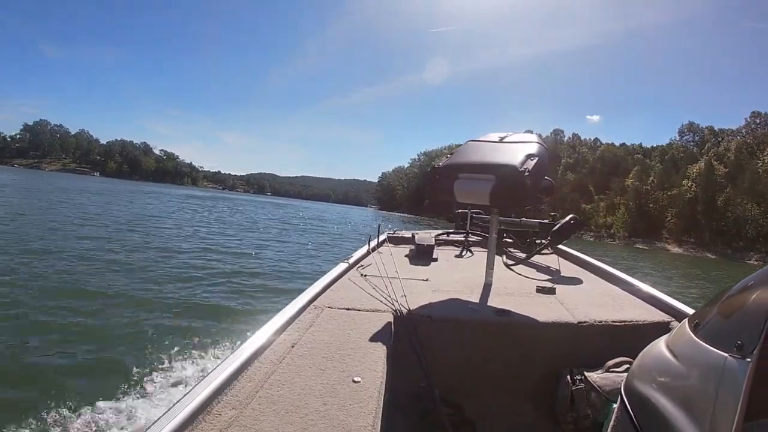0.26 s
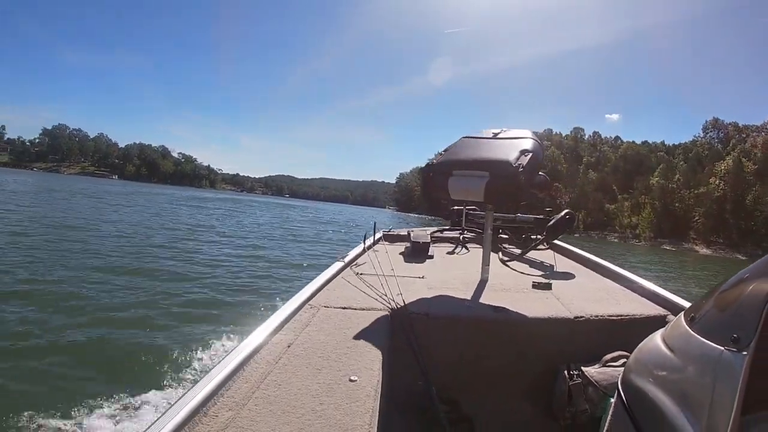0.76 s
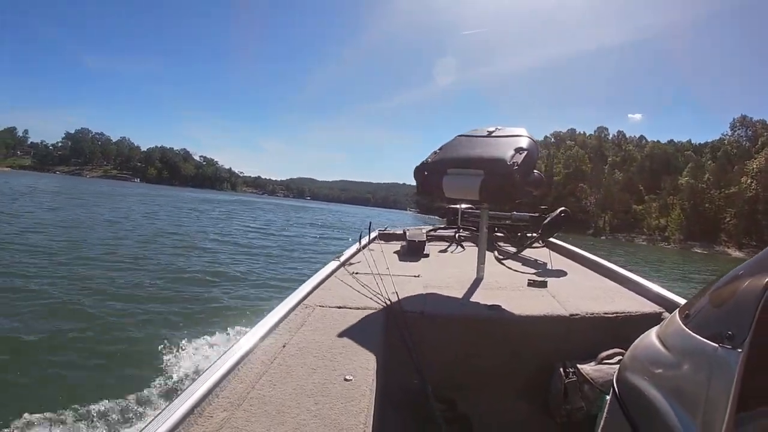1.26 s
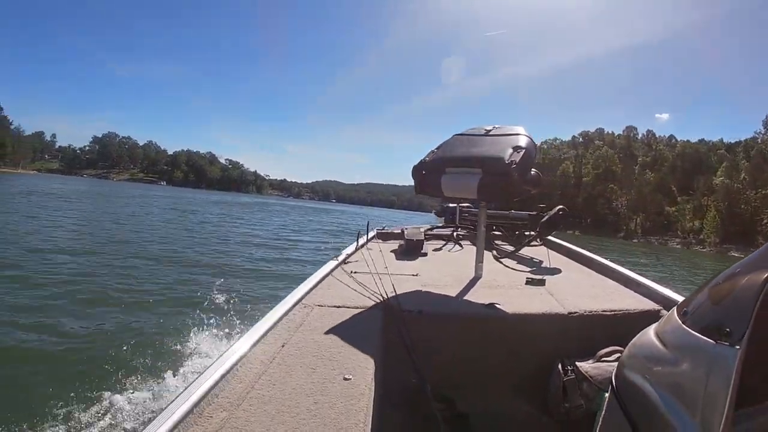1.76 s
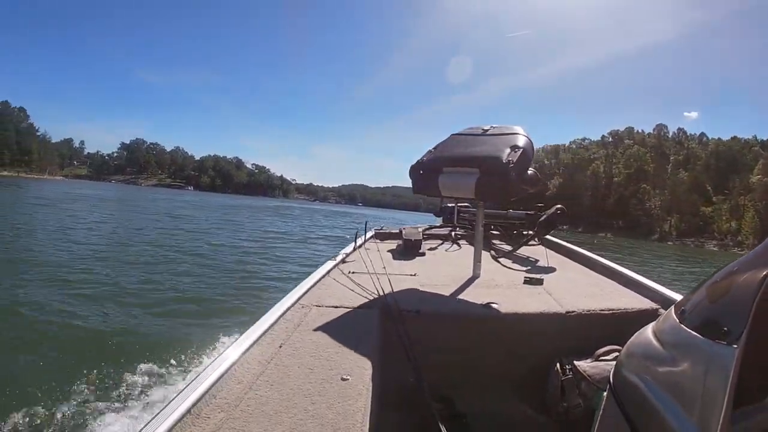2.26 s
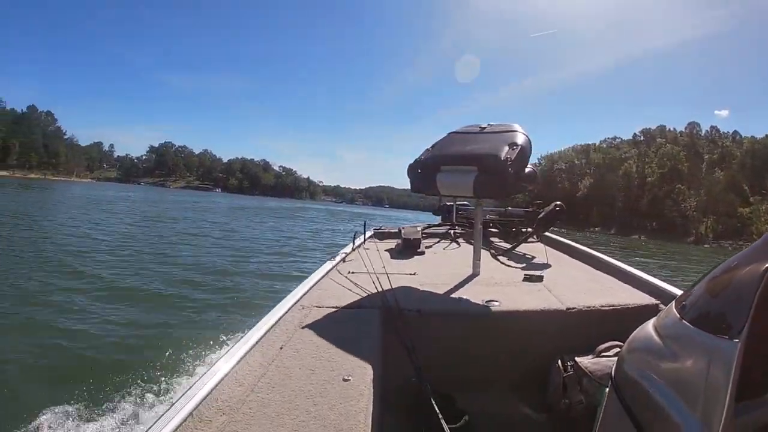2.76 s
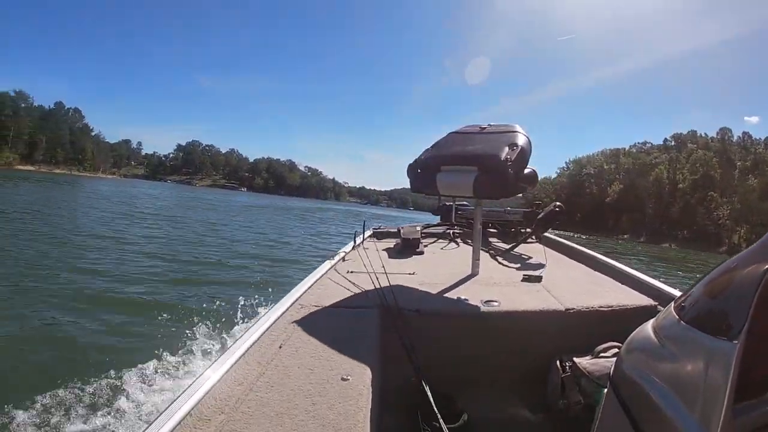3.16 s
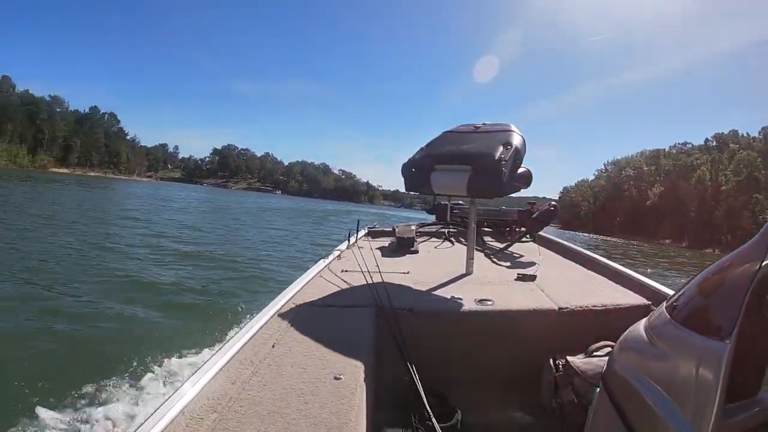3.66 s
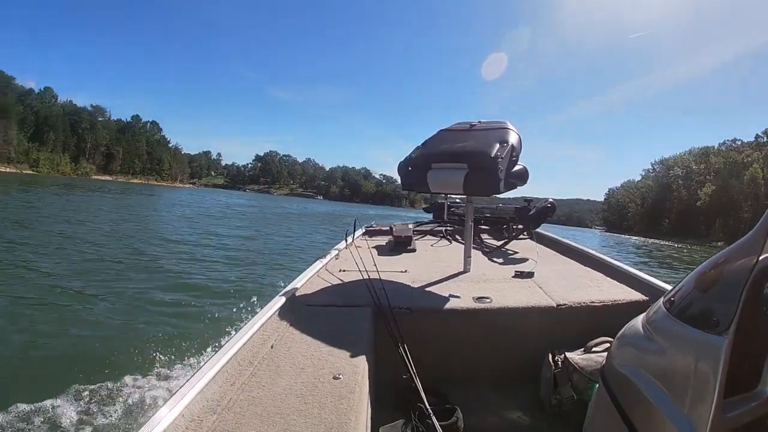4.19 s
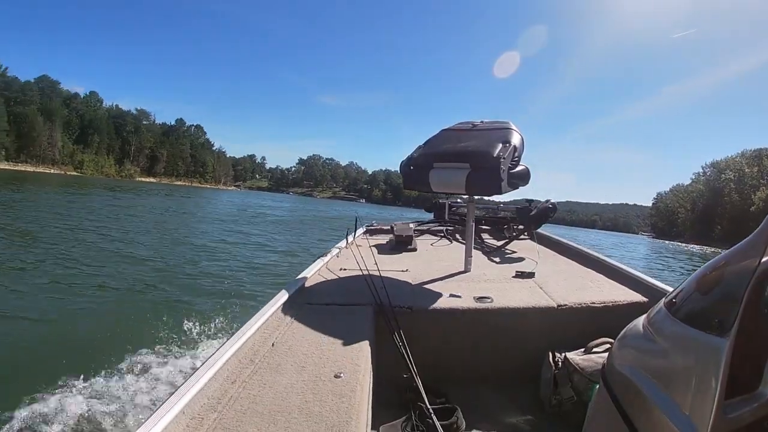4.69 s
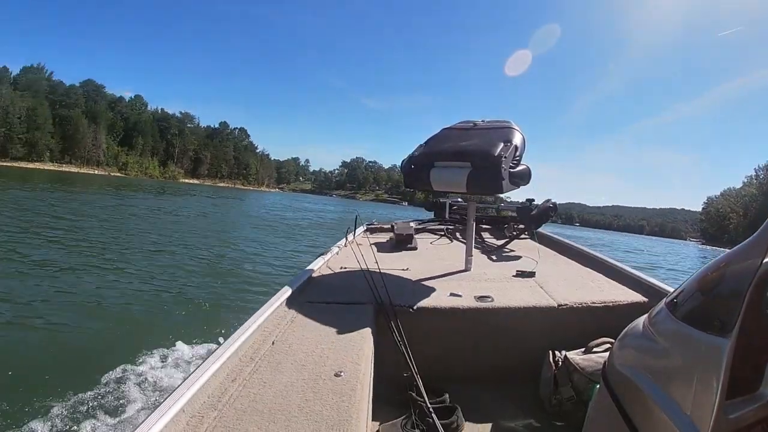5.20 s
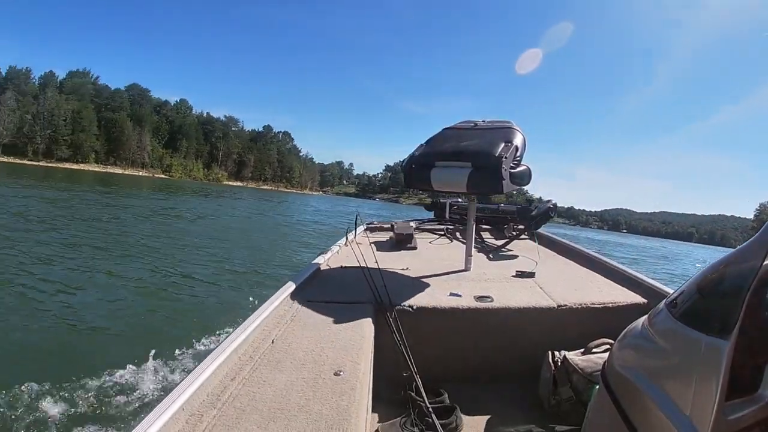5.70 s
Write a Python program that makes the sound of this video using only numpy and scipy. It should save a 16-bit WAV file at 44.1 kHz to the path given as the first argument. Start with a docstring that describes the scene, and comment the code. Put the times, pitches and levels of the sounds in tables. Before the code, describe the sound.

From a moving fishing boat's cockpit, an outboard motor holds a low, slightly wavering hum while headwind rumbles and flutters on an exposed microphone. Water rushes and fizzes along the hull in uneven splashes. Past the middle, a rough gust slaps the microphone hard for about a second and the motor sinks under it; later the hum surges back with a brief growl.

```python
"""An outboard motor drones near 241 Hz under a buffeting head wind, heard from a fishing boat's cockpit on a lake.
The motor is partials of its engine cycle, with a noisy skirt and growl. The wind is shaped noise in four bands,
with hollow hoots and pressure slaps at the microphone; one rough gust tears at it for about a second.
Spray hisses and gurgles off the hull as patchy noise and ringing bubbles; a few drops tick close by."""
import sys
import numpy as np
from scipy import signal
from scipy.fft import rfft, irfft, next_fast_len
from scipy.io import wavfile
from scipy.ndimage import uniform_filter1d, minimum_filter1d, map_coordinates

SR = 44100
rng = np.random.default_rng(int(sys.argv[2]) if len(sys.argv) > 2 else 0)


def persist_wave(psi):
    """Save psi, clipped to +-1, as 16-bit WAV."""
    counts = np.round(np.clip(psi, -1, 1) * 32767).astype(np.int16)
    wavfile.write(sys.argv[1], SR, np.atleast_2d(counts).T)


N = 261954


def amp(db):
    """Decibels to gain."""
    return 10 ** (np.asarray(db) / 20)


def unit(x):
    """Scale to rms 1."""
    return x / np.sqrt(np.mean(x ** 2) + 1e-20)


def white():
    """White noise over the whole scene."""
    return rng.standard_normal(N)


def curves(rows):
    """One value per sample for each column after the time."""
    s, *cols = np.transpose(rows)
    return [np.interp(np.arange(N) / SR, s, c) for c in cols]


def wobble(knots_per_s):
    """Smooth random curve through normally distributed knots."""
    knots = rng.standard_normal(int(N * knots_per_s / SR) + 4)
    return map_coordinates(knots, [np.arange(N) * knots_per_s / SR])


def filtered(x, response):
    """x times a response of frequency."""
    m = next_fast_len(N + SR // 2)
    return irfft(rfft(x, m) * response(np.fft.rfftfreq(m, 1 / SR)), m)[:N]


def coloured(x, spectrum):
    """x shaped by (frequency [Hz], level [dB]) points, at rms 1."""
    f, db = np.transpose(spectrum)
    return unit(filtered(x, lambda hz: amp(np.interp(np.log(hz + 1), np.log(f), db))))


def patchy(depth_db):
    """White noise with random patches of gain in time and frequency, at rms 1."""
    z = signal.stft(white(), nperseg=512)[2]
    field = uniform_filter1d(rng.standard_normal(z.shape), size=7, axis=0)
    field = uniform_filter1d(field, size=12, axis=1)
    return unit(signal.istft(z * amp(depth_db * unit(field)), nperseg=512)[1][:N])


def steadied(x, span_s):
    """x with its swells slower than span_s evened out."""
    size = int(span_s * SR)
    power = uniform_filter1d(uniform_filter1d(x ** 2, size), size)
    return x / np.sqrt(np.abs(power) + 1e-9)


def impacts(rate_per_s, spread_db):
    """Random impulses of uneven size and either sign, at rms 1."""
    struck = rng.random(N) < rate_per_s / SR
    size = amp(spread_db * white().clip(-2, 2))
    return unit(struck * rng.choice([-1, 1], N) * size)


def bells(s, length_s):
    """Bell-shaped swell around each time s, one per column; length_s is its full width at 1/e."""
    return np.exp(-(2 * (np.arange(N)[:, None] / SR - s) / length_s) ** 2)


def add(track, s, sound):
    """Mix a sound in at s seconds."""
    part = track[round(s * SR):][:len(sound)]
    part += sound[:len(part)]


# stray drops: (time [s], level before trim [dB], pitch [Hz])
DROPS = [(0.588, -46, 6300), (1.1415, -37.5, 6600), (2.004, -42, 6300), (2.544, -44.5, 6290),
         (2.763, -30.5, 6200), (4.667, -29, 3700), (5.8498, -46, 6593)]
# tick spectrum: (multiple of pitch [1], level [dB])
TICK_SPECTRUM = [(0.5, -19.5), (0.9, 4), (1.05, -1), (1.25, -9.5), (1.55, -7.5), (1.9, -18.5), (2.4, -37.5)]
DROP_TRIM_DB = -2.5


def drops():
    """A stray drop lands with a tiny bright tick; a bigger one sounds lower."""
    ticks, t = np.zeros(N), np.arange(SR // 20) / SR
    envelope = (1 - np.exp(-t / 0.0003)) * amp(-60 * t / 0.0065)  # falls 60 dB in 6.5 ms
    for s, db, hz in DROPS:
        spectrum = [(k * hz, level) for k, level in TICK_SPECTRUM]
        grain = coloured(white(), spectrum)[:len(t)]
        add(ticks, s, amp(db + DROP_TRIM_DB) * envelope * grain)
    return ticks


# larger bubbles beside the hull: (time [s], peak [dB], starting pitch [Hz])
GLUGS = [(3.506, -27, 524), (3.612, -24, 500), (3.65, -23.5, 543), (3.724, -23, 502), (4.133, -29, 570),
         (5.567, -31, 809), (5.632, -33, 765)]
GLUG_PEAK_S, GLUG_SWEEP_PER_S = 0.0028, 1.5  # time to peak; relative rise of pitch


def glugs():
    """A bubble swells, rings briefly and rises a little in pitch."""
    track, t = np.zeros(N), np.arange(SR // 20) / SR
    shape = t / GLUG_PEAK_S * np.exp(1 - t / GLUG_PEAK_S)
    for s, db, hz in GLUGS:
        turns = hz * t * (1 + GLUG_SWEEP_PER_S * t / 2) + rng.random()
        add(track, s, amp(db) * shape * np.sin(2 * np.pi * turns))
    return track


def bubbles(rate_per_s, low_hz, high_hz, decay_cycles, spread_db):
    """Tiny bubbles ring for a few cycles each, rising in pitch; rms 1."""
    when, size, strength = rng.random((int(rate_per_s * N / SR), 3)).T[:, :, None]
    n = np.arange(SR // 50)
    turns = low_hz * (high_hz / low_hz) ** size * n / SR
    age = turns / decay_cycles
    envelope = amp(spread_db * strength ** 3) * (1 - np.exp(-turns)) * np.exp(-age)
    rings = envelope * np.sin(2 * np.pi * turns * (1 + 0.036 * age))
    at = (when * N).astype(int) + n
    return unit(np.bincount(at.ravel(), rings.ravel(), N)[:N])


# waves the hull throws aside: (crest [s], rise of wash [dB], rise of fizz [dB])
SPLASHES = [(0.22, -1, 5.5), (0.54, 1.5, 2.5), (0.95, 2.5, 3), (1.14, 0.5, 4.5), (1.52, 1, 3.5),
            (1.859, 5, 6), (2.06, 1, 3), (2.88, 2.5, 0), (3.13, 4.5, 4.5), (3.391, 3, 5.5),
            (4.075, 6.5, 1.5), (4.571, 4.5, 2.5), (4.67, 0.5, 3), (4.8, 2.5, 2)]
SPLASH_RISE_S, SPLASH_FALL_S = 0.023, 0.074


def splashes():
    """Each wave lifts the spray quickly and lets it fall back; gives the rise of wash and fizz in dB."""
    s, wash_db, fizz_db = np.transpose(SPLASHES)
    late_s = np.arange(N)[:, None] / SR - s
    lift = np.exp(-np.maximum(-late_s / SPLASH_RISE_S, late_s / SPLASH_FALL_S))
    return lift @ wash_db, lift @ fizz_db


# spray between splashes; its fizz is much quieter from about 3.75 to 4.3 s:
# (time [s], wash level [dB], fizz level [dB])
SPRAY = [(0, -40.5, -50.5), (0.65, -40.5, -50.5), (1.3, -40, -49), (1.68, -40, -50.5), (2.05, -40, -47),
         (2.5, -40, -49.5), (3.0, -40, -50.5), (3.5, -39, -47), (3.62, -42, -49.5), (3.75, -41.5, -57.5),
         (3.96, -43.5, -59), (4.25, -42.5, -60), (4.36, -40, -53), (4.6, -40.5, -51.5), (5.35, -38.5, -49),
         (5.94, -41, -49.5)]
# spray spectra: (frequency [Hz], relative density [dB per Hz])
WASH_SPECTRUM = [(150, -22.5), (400, -5.5), (660, -2), (800, 3), (1000, 0.5), (1400, -0.5), (2100, -3.5),
                 (2800, -4.5), (3400, -9.5), (5000, -14), (6500, -38.5), (9000, -100)]
FIZZ_SPECTRUM = [(1200, -18), (2800, -0.5), (3800, -1), (4700, -3.5), (5600, -1.5), (6100, -11),
                 (7000, -20.5), (8000, -29), (9000, -25), (11500, -41), (14000, -68)]
MIST_SPECTRUM = [(5000, -38), (6500, 4.5), (8000, -2.5), (9200, 1.5), (11500, -1), (13000, -8.5),
                 (15000, -28)]
# level at mean fizz and time 0; dB per dB of fizz; steady fade
MIST_DB, MIST_DB_PER_FIZZ_DB, MIST_THINS_DB_PER_S = -72, 1.35, 1.2


def spray():
    """The bow wave washes and gurgles past; its droplets fizz above it and fine mist patters with the fizz."""
    wash_db, fizz_db = np.add(curves(SPRAY), splashes())
    fizz_db = fizz_db + 0.29 * wobble(16)
    gurgle = bubbles(rate_per_s=350, low_hz=650, high_hz=3600, decay_cycles=8, spread_db=15)
    wash = coloured(patchy(depth_db=1.0) + 0.44 * impacts(rate_per_s=700, spread_db=4.5), WASH_SPECTRUM)
    wash = wash + 0.27 * gurgle
    fizz = coloured(patchy(depth_db=2.1) + 0.66 * impacts(rate_per_s=1700, spread_db=7.5), FIZZ_SPECTRUM)
    mist = coloured(patchy(depth_db=0.5) + impacts(rate_per_s=400, spread_db=4.0), MIST_SPECTRUM)
    mist_db = MIST_DB + MIST_DB_PER_FIZZ_DB * (fizz_db - fizz_db.mean())
    mist_db = mist_db - MIST_THINS_DB_PER_S * np.arange(N) / SR
    wash_db = wash_db + 0.31 * wobble(22)
    flicker_db = 0.4 * wobble(25)  # fizz only, not mist
    return amp(wash_db) * wash + amp(fizz_db + flicker_db) * fizz + amp(mist_db) * mist


# gusts on the microphone: (middle [s], length [s], rise [dB], sharpness [dB]: + small eddies, - large ones)
GUSTS = [(0.04, 0.24, 3.1, 3.5), (0.255, 0.11, 6.6, 2.5), (0.755, 0.041, 7.9, 0), (0.9, 0.06, 2.8, -2.5),
         (1.166, 0.11, 4.8, 3), (1.527, 0.11, 6.05, 0), (1.79, 0.09, 3.5, 2), (2.06, 0.08, 4.25, 1.5),
         (2.23, 0.09, 1.2, 4.5), (2.38, 0.055, 0.3, -3.5), (2.456, 0.045, 4, 0), (2.759, 0.095, 6.6, 0.5),
         (2.922, 0.065, 6.8, -6.5), (3.158, 0.047, 10.5, -3), (3.355, 0.085, 8.4, 2), (3.504, 0.056, 7, 0),
         (3.61, 0.15, 8.3, 2.5), (3.735, 0.073, 3.4, 2), (3.85, 0.09, 5, 3), (4.072, 0.081, 6.8, -4),
         (4.19, 0.13, 9.5, 1), (4.47, 0.2, 4.9, -0.5), (4.815, 0.081, 4.5, 2), (4.91, 0.05, 6.1, 4.5),
         (5.35, 0.12, 2.5, 0.5), (5.467, 0.079, 3.5, -0.5), (5.66, 0.082, 4.2, -4), (5.735, 0.04, 4, 1.5),
         (5.785, 0.06, 1.8, -7)]


def gusts():
    """Each gust swells and fades as a bell; gives the rise and the sharpness in dB."""
    s, length_s, rise_db, sharp_db = np.transpose(GUSTS)
    swells = bells(s, length_s)
    return swells @ rise_db, swells @ sharp_db


# head wind between gusts: (time [s], level [dB])
BREEZE = [(0, -30), (0.62, -30), (1.05, -29.5), (1.65, -28), (2.15, -26.5), (2.4, -26), (2.54, -28),
          (2.68, -26), (3.05, -35.5), (3.6, -24.5), (3.85, -28.5), (3.96, -30), (4.3, -34), (4.7, -29),
          (5.0, -30), (5.22, -34), (5.6, -25.5), (5.76, -27), (5.83, -32), (5.94, -30.5)]
# eddy spectra, large to small: (frequency [Hz], relative density [dB per Hz])
RUMBLE_SPECTRUM = [(8, -18.5), (18, -3.5), (42, 0.5), (75, -3), (100, -9), (160, -34.5), (600, -120)]
BUFFET_SPECTRUM = [(50, -21), (90, -0.5), (150, 1), (220, -1.5), (300, -5.5), (400, -23.5), (600, -29.5),
                   (1200, -82), (4000, -120)]
FLUTTER_SPECTRUM = [(100, -24.5), (250, -2), (340, -0.5), (480, -7.5), (700, -14), (1100, -25.5),
                    (1800, -35), (4000, -57), (9000, -120)]
TEARING_SPECTRUM = [(300, -21.5), (600, 4), (1100, 0), (1700, -23), (3000, -27), (5500, -42.5),
                    (9000, -120)]
RUMBLE_DB, BUFFET_DB, FLUTTER_DB = 2, 1.5, -10.5  # against the breeze
TEARING_DB, TEARING_DB_PER_FLUTTER_DB = -37, 2.2  # level at the hardest flutter; growth


def wind():
    """Large eddies rumble, middling ones buffet; small ones flutter, and tear brighter in stronger wind."""
    (breeze_db,), (gust_db, sharp_db) = curves(BREEZE), gusts()
    lull_db = breeze_db - breeze_db.mean()
    wind_db = breeze_db.mean() + gust_db
    rumble_db = RUMBLE_DB + wind_db + lull_db - sharp_db + 0.85 * wobble(18)
    buffet_db = BUFFET_DB + wind_db + 0.85 * lull_db + wobble(22)
    flutter_db = FLUTTER_DB + wind_db + 0.98 * lull_db + sharp_db
    tearing_db = TEARING_DB + TEARING_DB_PER_FLUTTER_DB * (flutter_db - flutter_db.max())
    large = white()
    middling = white() + 0.63 * impacts(rate_per_s=60, spread_db=3.5)
    small = white() * amp(3.5 * wobble(110)) + 0.5 * impacts(rate_per_s=240, spread_db=6.0)
    rumble = steadied(coloured(large, RUMBLE_SPECTRUM), span_s=0.085)
    buffet = steadied(coloured(middling, BUFFET_SPECTRUM), span_s=0.034)
    flutter = steadied(coloured(small, FLUTTER_SPECTRUM), span_s=0.022)
    tearing = steadied(coloured(small, TEARING_SPECTRUM), span_s=0.051)
    low = amp(rumble_db) * rumble + amp(buffet_db) * buffet
    return low + amp(flutter_db) * flutter + amp(tearing_db) * tearing


# gusts that sound a hollow note: (middle [s], length [s], level [dB])
HOOTS = [(1.175, 0.11, -30.5), (1.776, 0.094, -24.5), (2.27, .05, -31.5), (2.457, 0.048, -19),
         (3.357, 0.048, -22.5), (3.723, 0.067, -24.5), (4.805, .09, -22.5), (5.537, 0.13, -27.5),
         (5.735, .04, -26.5)]
# hollow note: (frequency [Hz], relative density [dB per Hz])
HOLLOW_SPECTRUM = [(200, -43.5), (262, -5), (282, 0.5), (305, -5), (350, -13), (450, -46), (900, -110)]


def hoots():
    """Some gusts briefly sound a rough, hollow note just above the motor's tone."""
    s, length_s, db = np.transpose(HOOTS)
    note = steadied(coloured(white(), HOLLOW_SPECTRUM), span_s=0.028)
    return bells(s, length_s) @ amp(db) * note


def doublet(t, width_s):
    """One push and pull of pressure, width_s to each peak, peak 1."""
    u = t / width_s
    return u * np.exp((1 - u * u) / 2)


PUFF_PEAK_S, PUFF_TOP_HZ = 0.002, 6000
PUFF_ROUNDING_OCTAVES, PUFF_EDGE_DB_PER_OCTAVE = 0.26, 19.5


def puff(t, centre_hz):
    """A few milliseconds of ragged air around one pitch, rms 1 at its peak."""
    hz = np.fft.rfftfreq(len(t), 1 / SR) + 1
    octaves = np.hypot(np.log2(hz / centre_hz), PUFF_ROUNDING_OCTAVES)
    colour = amp(-PUFF_EDGE_DB_PER_OCTAVE * octaves) * (hz < PUFF_TOP_HZ)
    air = irfft(rfft(rng.standard_normal(len(t))) * colour, len(t))
    shape = t / PUFF_PEAK_S * np.exp(1 - t / PUFF_PEAK_S)
    return unit(air * shape) * np.sqrt(np.mean(shape ** 2))


# eddies slapping the microphone: (time [s], thump level before trim [dB], puff level [dB], puff centre [Hz])
SLAPS = [(1.509, -10, -31, 419.5), (1.811, -10, -34.5, 453), (2.011, -6, -32, 480),
         (2.029, -8.5, -26.5, 479.6), (2.064, -9.5, -31, 700), (2.085, -20, -38, 790),
         (2.201, -23, -33, 644), (2.238, -22, -31.5, 560.3), (2.453, -8, -28, 400), (2.584, -17, -34, 730),
         (2.613, -26, -29.5, 557), (2.732, -16, -26.5, 560), (2.749, -11, -30, 520),
         (2.783, -10.5, -34.5, 750), (3.37, -9, -23, 685), (3.498, -6, -29.5, 478.6),
         (3.508, -19, -28, 540), (3.525, -14, -33, 550), (3.566, -13, -29, 646), (3.574, -21, -23.5, 740),
         (3.597, -2.5, -19, 850), (3.605, -13, -19, 650), (3.614, -4, -22.5, 482), (3.63, -11, -25.5, 850),
         (3.641, -15, -26, 720), (3.652, -9, -26.5, 579.7), (3.697, -15, -34, 720), (3.724, -9, -28.5, 534),
         (3.775, -6, -19.5, 640), (3.789, -22, -37, 1000), (3.819, -6, -26, 740), (3.831, -15, -26.5, 500),
         (3.869, -12, -30.5, 640), (4.069, -8.5, -27.5, 1180), (4.082, -13, -29.5, 520),
         (4.133, -16, -30.5, 561.4), (4.155, -14, -27.5, 580), (4.178, -23, -36, 620),
         (4.21, -17, -38, 670), (4.821, -11, -37, 460), (5.68, -10, -33.5, 399.6),
         (5.734, -9.5, -27.5, 480)]
THUMP_TRIM_DB = -3.0
SNAP_DB, SNAP_DB_PER_PUFF_DB = -23.5, 2.1  # peak of the hardest; growth


def slaps():
    """Each eddy gives a broad thump and a short puff; small eddies puff higher, and the hardest snap."""
    track, t = np.zeros(N), np.arange(SR // 20) / SR
    hardest_db = max(row[2] for row in SLAPS)
    signs = rng.choice([-1, 1], len(SLAPS))
    for (s, thump_db, puff_db, centre_hz), sign in zip(SLAPS, signs):
        thump = amp(thump_db + THUMP_TRIM_DB) * doublet(t - 0.004, width_s=0.00085)
        snap_db = SNAP_DB + SNAP_DB_PER_PUFF_DB * (puff_db - hardest_db)
        snap = amp(snap_db) * doublet(t - 0.002, width_s=0.00013)
        add(track, s, sign * (thump + snap) + amp(puff_db) * puff(t, centre_hz))
    return track


def partials(rows, cycle):
    """Multiples of the engine cycle, each drifting in level; the higher ones blur more in phase."""
    total = np.zeros(N)
    for k, db in rows:
        blur = 0.03 * k * wobble(24)
        phase = round(k) * cycle + rng.uniform(0, 2 * np.pi) + blur
        total += amp(db + 2 * wobble(9)) * np.sin(phase)
    return total


# firing tone, sagging under load, before jitter: (time [s], frequency [Hz])
FIRING = [(0.0, 240.7), (0.2, 243.2), (0.45, 241.3), (0.8, 243), (1.15, 240.3), (1.35, 242.3), (1.8, 241.7),
          (2.0, 240.8), (2.28, 243.3), (2.75, 241.5), (3.3, 241), (3.7, 237.5), (4.0, 241.2), (4.45, 238.3),
          (4.7, 239.9), (4.98, 239.1), (5.35, 239.3), (5.55, 241.6), (5.94, 241)]
# firing tone before waver, surging at first, faint around 4 s, strong again from 4.8 s:
# (time [s], rms level [dB])
DRONE = [(0.0, -12.5), (0.16, -19), (0.27, -15.5), (0.37, -18), (0.47, -13), (0.62, -21.5), (0.74, -16.5),
         (0.8, -23.5), (0.88, -15), (0.96, -20), (1.25, -19.5), (1.42, -13), (1.52, -20.5), (1.95, -19),
         (2.09, -24), (2.42, -23), (3.14, -23), (3.43, -29.5), (3.87, -25), (4.06, -35.5), (4.19, -27),
         (4.5, -26.5), (4.55, -25), (4.6, -21), (4.66, -27.5), (4.75, -24), (4.82, -15), (4.89, -22),
         (5.0, -24.5), (5.04, -28), (5.13, -18), (5.27, -17), (5.39, -14.5), (5.62, -21), (5.94, -26.5)]
# partials before swell and drift: (multiple of the four-stroke cycle [1], rms level [dB])
PARTIALS = [(1, -40.5), (2, -47), (3, -41.5), (7, -37.5), (8, -45), (9, -49.5), (10, -57), (12, -53),
            (13, -58.5)]
# whine, rising near 0.2, 1.4 and 5.6 s and faint around 4.3 s: (time [s], gain [dB])
WHINE = [(0, -7), (0.17, 8), (0.4, -6), (1.4, 4.5), (3.3, -3), (4.3, -8.5), (5.3, -1.5), (5.57, 8.5),
         (5.94, 1)]
# whine partials near 800 Hz, before that gain and drift: (multiple of the cycle [1], rms level [dB])
WHINE_PARTIALS = [(19, -56), (20, -56.5), (21, -58), (24, -59)]
# growl under the tone, strongest from about 5.3 to 5.6 s: (time [s], level [dB])
GROWL = [(0, -30.5), (0.85, -37), (1.7, -34.5), (2.6, -36), (3.05, -40), (3.4, -32.5), (4.3, -35.5),
         (4.8, -32), (5.2, -34), (5.3, -22.5), (5.58, -25.5), (5.78, -38), (5.94, -31)]
# growl partials: (multiple of the cycle [1], relative level [dB])
GROWL_PARTIALS = [(4, -3.5), (5, -3.5)]
# rough part of the growl: (frequency [Hz], relative density [dB per Hz])
GROWL_SPECTRUM = [(100, -39.5), (150, -2), (185, 2.5), (225, 0.5), (270, -21.5), (600, -100)]
GROWL_ROUGH_DB = -6  # against the growl partials
WAVER_DB, WAVER_DB_PER_DB_SUNK, WAVER_KNOTS_PER_S = 0.25, 0.12, 18
CYLINDERS, SKIRT_DB = 6, -40.5  # skirt level at the mean drone


def motor():
    """Six firings a cycle make the main tone; unequal cylinders add the other multiples."""
    (firing_hz,), (drone_db,), (whine_db,), (growl_db,) = map(curves, (FIRING, DRONE, WHINE, GROWL))
    jittered_hz = firing_hz * (1 + 0.004944 * wobble(25))
    cycle = 2 * np.pi * np.cumsum(jittered_hz) / SR / CYLINDERS
    waver_db = WAVER_DB + WAVER_DB_PER_DB_SUNK * (drone_db.max() - drone_db)
    tone_db = drone_db + waver_db * (wobble(WAVER_KNOTS_PER_S) + wobble(45) / 2)
    tone = amp(tone_db) * np.sin(CYLINDERS * cycle)
    # the weaker partials follow the swells of the main tone only in part
    swell_db = drone_db - drone_db.mean()
    rest = amp(0.51 * swell_db) * partials(PARTIALS, cycle)
    whine = amp(whine_db) * partials(WHINE_PARTIALS, cycle)
    # uneven combustion adds a rough, noisy skirt mostly just above the tone, and a growl beneath it
    skirt = coloured(white(), [(120, -41.0), (210, -12.5), (270, 5.5), (320, 5.5), (420, -25.5),
                               (900, -70.0), (3000, -120)])
    rough = amp(GROWL_ROUGH_DB) * coloured(white(), GROWL_SPECTRUM)
    growl = steadied(unit(partials(GROWL_PARTIALS, cycle)) + rough, span_s=0.06)
    pitched = np.sqrt(2) * (tone + rest + whine)  # sine peak to rms
    return pitched + amp(SKIRT_DB + 0.92 * swell_db) * skirt + amp(growl_db) * growl


def scene():
    """Everything as it reaches the cockpit."""
    water = drops() + glugs() + spray()
    air = wind() + hoots() + slaps()
    return (water + air + motor())[None]


CEILING, TOP_HZ = 0.6, 15000  # limiter threshold [full scale]; band limit


def record(dry):
    """A limiter holds down the hardest peaks; nothing passes above the band limit."""
    needed = np.minimum(1, CEILING / (np.abs(dry[0]) + 1e-9))
    gain = uniform_filter1d(minimum_filter1d(needed, size=441), size=441)  # 10 ms windows
    return filtered(dry[0] * gain, lambda hz: hz < TOP_HZ)[None]


dry = scene()
out = record(dry)
persist_wave(out)
```